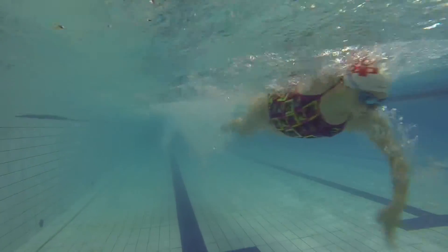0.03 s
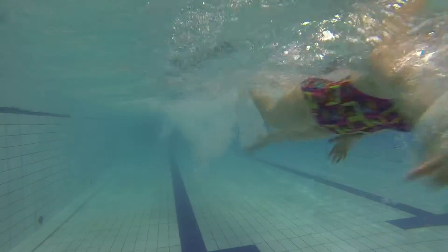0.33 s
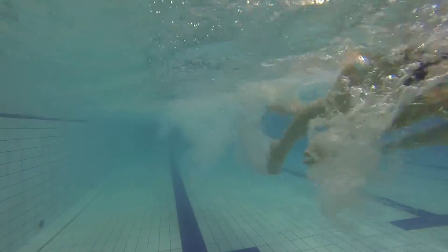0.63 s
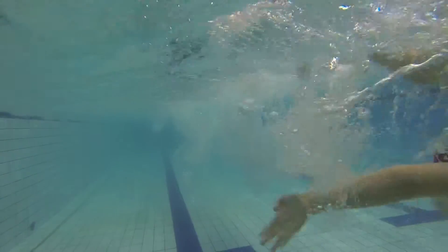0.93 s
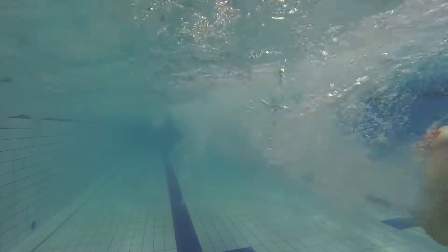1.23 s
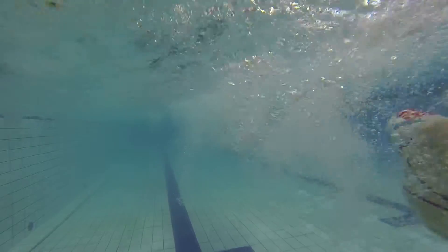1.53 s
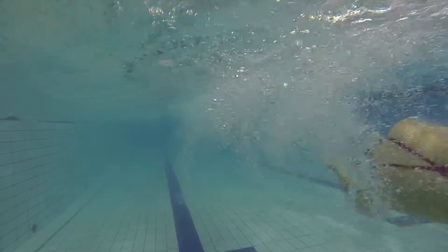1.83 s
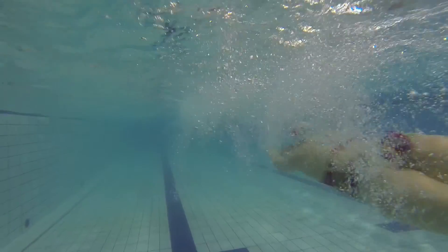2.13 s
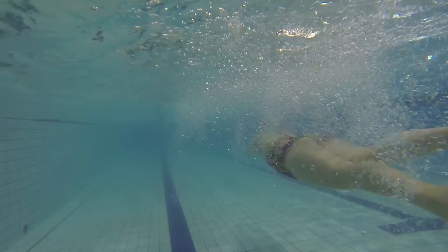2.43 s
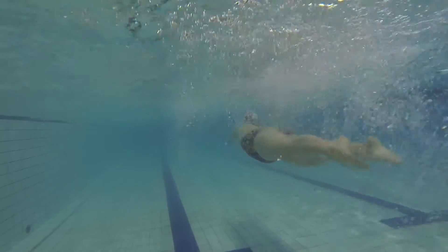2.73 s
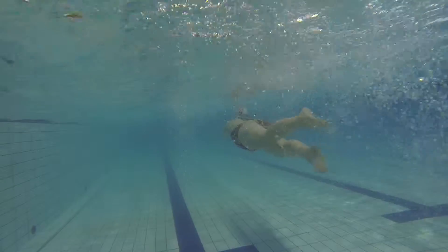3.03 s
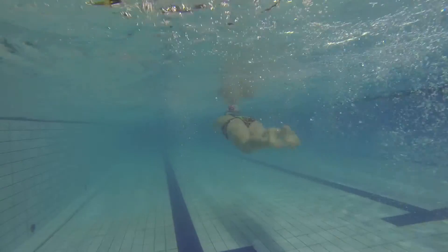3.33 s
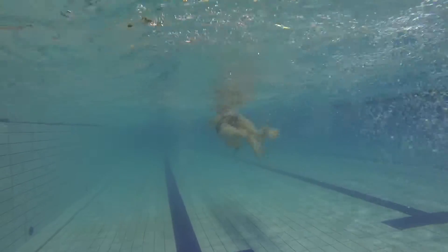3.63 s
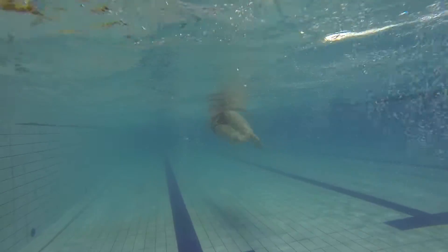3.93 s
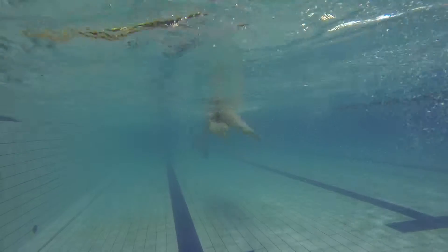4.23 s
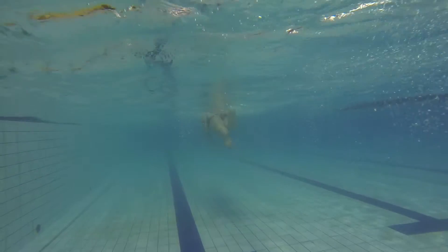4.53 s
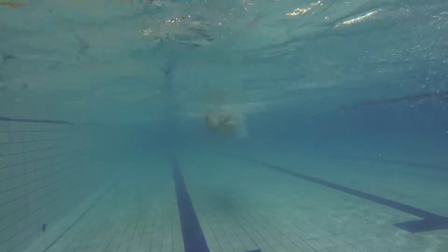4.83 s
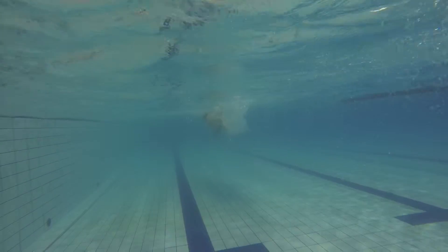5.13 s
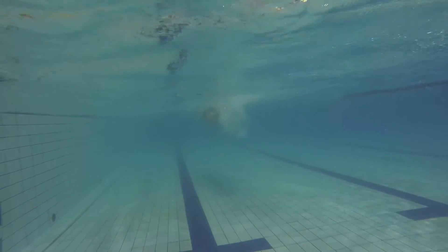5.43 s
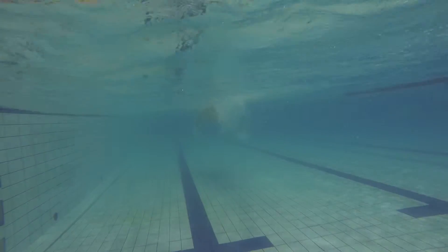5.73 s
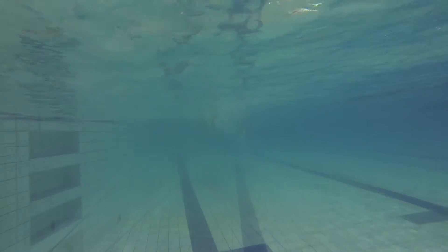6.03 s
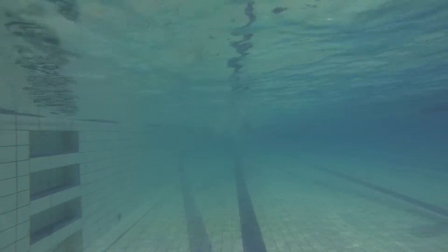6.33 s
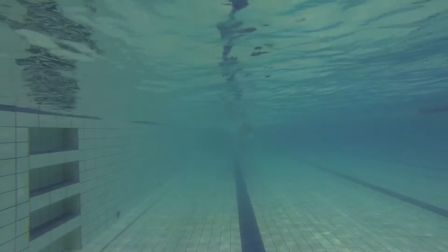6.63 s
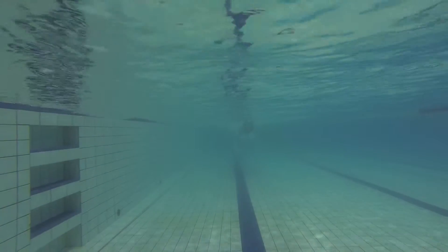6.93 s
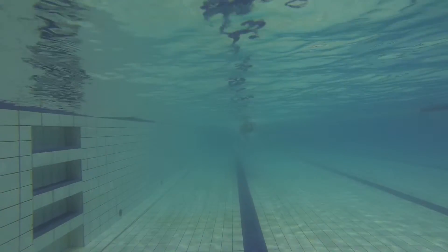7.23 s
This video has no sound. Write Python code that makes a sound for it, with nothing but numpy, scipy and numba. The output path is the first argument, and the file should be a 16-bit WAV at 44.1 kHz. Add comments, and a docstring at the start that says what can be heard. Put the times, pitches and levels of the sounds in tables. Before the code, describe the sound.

Heard underwater, a swimmer's strokes boom, gurgle and fizz, two knocks hit the microphone, then the bubbles thin and a low drone rises.

```python
"""Swimmer passing, heard under water

A swimmer strokes past a submerged camera in a pool, turns and glides away kicking. Arms and feet
drag down air: big pockets boom, and clouds of bubbles gurgle and fizz, muffled by the ringing housing.
Two knocks hit the housing; once the swimmer is far off, the low hum of the pool takes over."""
import sys
import numpy as np
from scipy import signal
from scipy.fft import rfft, irfft, next_fast_len
from scipy.io import wavfile
from scipy.ndimage import uniform_filter1d
from numba import njit

SR = 44100
rng = np.random.default_rng(int(sys.argv[2]) if len(sys.argv) > 2 else 0)


def master_out(mix):
    """Clip the mix to full scale and print it as 16-bit PCM to the path in sys.argv[1]."""
    frames = np.transpose(np.atleast_2d(mix))
    ceiling = np.clip(frames, -1, 1)
    pcm = np.round(ceiling * 32767).astype(np.int16)
    wavfile.write(sys.argv[1], SR, pcm)


N = 329427
TIME = np.arange(N) / SR

# close strokes, from the last arm pulls to the push off the wall:
# t/s, length/s, churn/dB, gurgle/dB, fine gurgle/dB re gurgle, foam/dB
STROKES = [(0.15, 0.093, -49, -31, -8, -66), (0.327, .21, -31, -25.5, -7.5, -37),
           (0.632, .18, -29, -34.5, -5.5, -42), (1.188, 0.21, -36, -34, -17, -42.5),
           (1.443, 0.22, -32, -32.5, -26, -44.5), (1.825, 0.033, -34.5, -32, -25, -52),
           (2.05, 0.13, -37.5, -28.5, -0.5, -45.5)]


def undb(db):
    """Decibels to gain."""
    return 10 ** (np.asarray(db) / 20)


def curve(rows, axis=1):
    """One column of a table, joined by straight lines in time."""
    rows = np.array(rows)
    return np.interp(TIME, rows[:, 0], rows[:, axis])


def unit(x):
    """Scale to rms 1."""
    return x / np.sqrt(np.mean(x ** 2))


def even(x, size=6000):
    """Hold the slow level at 1 and keep the quick flicker."""
    return x / np.sqrt(uniform_filter1d(uniform_filter1d(x ** 2, size), size // 2) + 1e-18)


def walk(rate):
    """Smooth random wander, spread near 1."""
    return np.interp(TIME * rate, np.arange(1024), 1.2 * rng.standard_normal(1024))


def lowpass(x, hz):
    """Steep low-pass."""
    return signal.sosfilt(signal.ellip(8, .2, 70, hz, fs=SR, output="sos"), x)


def add(out, start, sound):
    """Mix a sound in at a time."""
    i = max(int(start * SR), 0)
    out[i:i + len(sound)] += sound[:max(N - i, 0)]


def swell_and_fade(swell, t60):
    """Envelope: a smooth attack, then exponential decay; times in seconds."""
    t = np.arange(int((swell + t60) * SR)) / SR
    attack = np.sin(np.pi / 2 * np.minimum(t / swell, 1)) ** 2
    return attack * undb(-60 * np.maximum(t - swell, 0) / t60)


def ring(hz, swell, t60, glide=0):
    """A tone that swells and dies away; glide bends its pitch up."""
    envelope = swell_and_fade(swell, t60)
    t = np.arange(len(envelope)) / SR
    return envelope * np.sin(2 * np.pi * hz * t * (1 + glide * t / (swell + t60) / 2))


@njit
def grains(starts, hz, cycles, size, glide, length):
    """Sum of damped bubble tones with a soft onset, each gliding upward."""
    out = np.zeros(length)
    for k in range(len(starts)):
        n = int(cycles[k] * SR / hz[k]) + 2
        omega = 2 * np.pi * hz[k] / SR
        step, bend = np.exp(1j * omega - 6 / n), np.exp(1j * omega * glide / n)
        phasor, onset, ease = size[k] + 0j, 1., np.exp(-omega / 5)
        for i in range(starts[k], min(starts[k] + n, length)):
            phasor *= step
            step *= bend
            onset *= ease
            out[i] += phasor.imag * (1 - onset)
    return out


def housing(x, size=8192):
    """The camera housing muffles the water and rings at its own resonances."""
    # housing resonances: f/Hz, width/Hz, level/dB
    resonances = [(32, 77, 2), (78, 213, 3), (190, 52, 0.5), (244, 68, -0.5), (352, 200, -12),
                  (440, 97, -3), (521.6, 27, 0.5), (637.3, 108, 3.5), (804, 313, -6.5), (1070, 64, -8.5),
                  (1230, 330, -13), (1559, 253, -13), (2230, 386, -21), (2970, 100, -36), (3520, 900, -35),
                  (4980, 450, -46.5), (5600, 360, -47), (6470, 430, -46), (8800, 3800, -54),
                  (11200, 530, -52.5), (13000, 4400, -60.5)]
    # dips where neighbouring resonances cancel: f/Hz, width/Hz, gain/dB
    notches = [(1094, 56, -15.5), (2110, 370, -4)]
    f = np.maximum(np.arange(size // 2 + 1) * SR / size, 1)
    power = sum((undb(db) / (1 + ((f / hz - hz / f) * hz / width) ** 2)) ** 2
                for hz, width, db in resonances)
    dips_db = sum(db / (1 + (2 * (f - hz) / width) ** 2) for hz, width, db in notches)
    # minimum phase, so the ringing follows each bubble
    cepstrum = irfft(np.log(np.sqrt(power) * undb(dips_db)))
    cepstrum[1:size // 2] *= 2
    cepstrum[size // 2 + 1:] = 0
    impulse = irfft(np.exp(rfft(cepstrum)))
    return signal.fftconvolve(x, impulse)[:N]


def cloud(low_hz, high_hz, cycles, spread_db, clump_db, count):
    """A steady bed of bubbles of one size class, shed in clumps and heard through the housing."""
    when, pitch, life, strength = rng.random((count, 4)).T
    starts = (when * N).astype(np.int64)
    hz = np.minimum(low_hz * (high_hz / low_hz) ** pitch, SR / 3)
    db = -spread_db * np.log(np.maximum(1 - strength, 4 / count))
    db += clump_db * walk(30)[starts]
    # small bubbles ring briefly, so they must peak higher to carry the same power per Hz
    tones = grains(starts, hz, cycles * (.5 + life), undb(db) * hz, glide=0.19, length=N)
    # nothing of the bubbles sounds below the band's lowest pitch
    low_cut = signal.butter(6, .85 * low_hz, "high", fs=SR, output="sos")
    return even(housing(signal.sosfilt(low_cut, tones)))


def flow(trail_db, peaks_db, swell, t60):
    """Gain of one bubble size: the trail plus the strokes, each of which swells, holds and dies away."""
    power = undb(trail_db) ** 2 * np.ones(N)
    for (start, length, *_), db in zip(STROKES, peaks_db):
        rise = np.sin(np.pi / 2 * np.clip((TIME - start) / swell, 0, 1)) ** 2
        decay_db = 60 * np.maximum(TIME - start - length, 0) / t60
        power += (rise * undb(db - decay_db)) ** 2
    return np.sqrt(power)


def gurgle(coarse_gain, fine_gain):
    """Pea-sized bubbles; the push from the wall tears them finer."""
    large = cloud(low_hz=352, high_hz=507.5, cycles=10.2, spread_db=3.0, clump_db=1.0, count=2500)
    middle = cloud(low_hz=496.5, high_hz=762, cycles=18.9, spread_db=1.5, clump_db=1.5, count=4500)
    fine = cloud(low_hz=715, high_hz=1153, cycles=11.8, spread_db=2.5, clump_db=0.6, count=4500)
    return even(middle + large * undb(-1)) * coarse_gain + fine * undb(-2) * fine_gain


def wake(slosh_db=-47.5):
    """The swimmer's trail of air, from slow churning pockets up to fine fizz; every stroke feeds it."""
    # air behind the kicking feet, loud when near and again as the swimmer surfaces:
    # t/s, gurgle/dB, fine gurgle/dB re gurgle, surface foam/dB
    trail = [(0, -35.5, -8, -43.5), (1.05, -34, -8, -44), (2.0, -33, -17.5, -49.5),
             (2.3, -34.5, -1.5, -49.5), (2.58, -42.5, -7, -51.5), (3.0, -43.5, -8.5, -53),
             (3.6, -44, -4.5, -51.5), (4.0, -46.5, -1, -52), (4.25, -45, -5.5, -51), (4.85, -40, -9, -45.5),
             (5.3, -39.5, -12.5, -46), (5.7, -43, -10, -49), (6.05, -46, -13.5, -51.5),
             (6.65, -48, -8, -63.5), (7.05, -50.5, -5.5, -66), (7.47, -49, -12, -65)]
    # fizz hanging in the trail: t/s, level/dB
    trail_fizz = [(0, -68), (0.55, -63), (0.92, -70.5), (1.15, -63.5), (1.62, -66), (1.8, -73),
                  (2.4, -77.5), (5.8, -75.5), (6.3, -82), (7.47, -84.5)]
    trail_db, trail_fine_db, trail_foam_db = (curve(trail, axis=k) for k in range(1, 4))
    _, _, churn_db, gurgle_db, fine_db, foam_db = np.transpose(STROKES)
    fizz_db = -67.5 + 0.23 * (foam_db + 47.5)  # fizz grows more slowly than the foam that sheds it

    churn_gain = flow(slosh_db, churn_db, swell=0.012, t60=1.88)
    coarse_gain = flow(trail_db, gurgle_db, swell=0.17, t60=0.65)
    fine_gain = flow(trail_db + trail_fine_db, gurgle_db + fine_db, swell=0.17, t60=0.65)
    foam_gain = flow(trail_foam_db, foam_db, swell=0.032, t60=0.6)
    fizz_gain = flow(curve(trail_fizz), fizz_db, swell=0.031, t60=0.68)
    spray_gain = undb(-5) * np.sqrt(foam_gain * fizz_gain)

    churn = cloud(low_hz=20.84, high_hz=355, cycles=5.6, spread_db=-0.5, clump_db=-2.0, count=4000)
    small = cloud(low_hz=1100, high_hz=2650, cycles=24.5, spread_db=2.07, clump_db=0.85, count=22000)
    plinks = cloud(low_hz=1200, high_hz=1800, cycles=36, spread_db=4.5, clump_db=0, count=400)
    spray = cloud(low_hz=2584, high_hz=4350, cycles=39, spread_db=2.5, clump_db=0.3, count=18000)
    fizz = cloud(low_hz=4670, high_hz=14800, cycles=29, spread_db=2.9, clump_db=1.4, count=60000)
    foam = small * undb(-1) + plinks * undb(-11)
    body = churn * churn_gain + gurgle(coarse_gain, fine_gain) * undb(-0.54)
    return body + foam * foam_gain + spray * spray_gain + fizz * fizz_gain


def bubbles(pop_cycles=32):
    """Single air pockets boom; bubbles bloop and pop near the housing, strays at random."""
    # the largest pockets and bubbles: t/s, f/Hz, peak/dB, t60/s
    pockets = [(0.000, 66, -14, 0.074), (0.164, 641, -23.5, 0.083), (0.312, 170, -22, 0.08),
               (0.333, 1160, -21, 0.01), (0.349, 76.4, -8, .43), (0.38, 1050, -23.5, 0.015),
               (0.451, 127.5, -22.5, 0.9), (0.521, 191.5, -19.5, 0.47), (0.534, 624, -16, 0.073),
               (0.652, 41.6, -15.5, 0.51), (0.655, 187.2, -17.5, 0.16), (0.709, 640, -17, 0.058),
               (0.716, 462, -21, 0.076), (0.770, 79.4, -16.5, 0.16), (0.827, 649, -18, 0.096),
               (0.864, 59, -28, 1), (0.892, 620, -22.5, .03), (1.002, 388, -24.5, 0.049),
               (1.108, 130, -20, 0.071), (1.197, 622, -27, 0.061), (1.341, 185, -22.5, 0.12),
               (1.436, 661, -25, 0.14), (1.485, 546.4, -17.5, .2), (1.507, 187, -15.5, 0.13),
               (1.520, 42, -26, 0.27), (1.530, 93.6, -18, .15), (1.600, 622, -26.5, 0.2),
               (1.645, 78, -21, 0.085), (1.677, 626, -20, 0.23), (1.865, 369, -17.5, 0.056),
               (1.868, 627, -17, 0.027), (2.064, 71, -21.5, 0.067), (2.133, 716, -21.5, 0.035),
               (2.201, 365, -20.5, 0.094), (2.256, 217, -24.5, 0.082), (2.261, 657, -23.5, 0.056),
               (2.447, 127, -32.5, 0.22), (2.781, 73.6, -30, 0.31), (3.957, 414, -38, 0.14),
               (4.032, 58, -34, 0.17), (4.402, 75.5, -34.5, 0.36), (4.837, 56, -30.5, 0.62),
               (4.887, 53.5, -30.5, 0.35), (4.843, 212, -31.5, 0.11), (4.996, 435, -33, 0.31),
               (5.1705, 1510, -20, 0.026), (6.062, 515, -31.5, 0.079), (6.236, 570, -20.5, 0.049),
               (6.595, 27, -32.5, 0.6), (6.882, 463, -32, 0.11), (7.268, 405, -31, 0.049),
               (7.39, 382, -32, .1)]
    # tiny bubbles bursting: t/s, peak/dB, f/Hz
    pops = [(0.242, -40, 3600), (0.335, -35, 3500), (3.445, -42, 1230), (3.555, -47, 3720),
            (3.911, -37.5, 1530), (4.916, -37.5, 2210), (5.309, -36, 2220), (5.518, -36, 1680),
            (5.828, -42.5, 2200), (6.498, -55, 5030), (6.525, -38, 750), (7.011, -57, 4560),
            (7.283, -46, 1680)]
    # stray bubbles all through the pool: lowest f/Hz, highest f/Hz, base level/dB
    strays = [(403, 760, -38), (1230, 2000, -45)]
    out = np.zeros(N)
    for start, hz, db, t60 in pockets:
        pinch_off_s = 0.0061 * np.sqrt(t60 / 0.14)  # long ringers swell more slowly
        add(out, start, undb(db) * ring(hz, pinch_off_s, t60, glide=0.019))
    for start, db, hz in pops:
        add(out, start, undb(db) * ring(hz, swell=7 / hz, t60=pop_cycles / hz, glide=0.068))
    for low_hz, high_hz, base_db in strays:
        for when, pitch, strength in rng.random(size=(18, 3)):
            hz = low_hz * (high_hz / low_hz) ** pitch
            tone = ring(hz, swell=2.8 / hz, t60=pop_cycles / hz, glide=0.067)
            add(out, when * N / SR, undb(base_db - 9 + 6 * strength) * tone)
    return out


def electronics(hiss_db=-73, corner_hz=3800):
    """The camera's smooth hiss and thin steady whine."""
    # whine partials: f/Hz, rms level/dB
    partials = [(10950, -90), (10998, -91.5), (13598, -101)]
    hiss = signal.lfilter(*signal.butter(1, corner_hz, fs=SR), rng.standard_normal(N))
    whine = sum(np.sqrt(2) * undb(db) * np.sin(2 * np.pi * hz * TIME) for hz, db in partials)
    return undb(hiss_db) * unit(hiss) + whine


def splashes():
    """A limb breaking the surface lets loose a brief bright spray of bubbles."""
    # surface hits: t/s, level/dB, swell/s, t60/s
    hits = [(0.315, -43, 0.013, 0.56), (0.415, -46.5, 0.017, 0.53), (1.19, -45, .012, 0.9),
            (1.30, -50.5, 0.032, 0.61), (1.666, -37.5, 0.019, 0.089), (2.078, -52, 0.0044, .05)]
    burst = np.zeros(N)
    for start, db, swell, t60 in hits:
        add(burst, start, undb(db) * swell_and_fade(swell, t60))
    return burst * cloud(low_hz=1720, high_hz=5300, cycles=17, spread_db=3.5, clump_db=3.0, count=22000)


def knocks(split_hz=1800, reach_octaves=0.27, grit_db=-11):
    """Each knock rings the housing: a dull thud in the low modes, a gritty tick in the high ones."""
    # contacts that make up the two knocks: t/s, thud/dB, tick/dB, tick centre f/Hz
    contacts = [(2.2100, -25, -33, 6960), (2.2119, -31, -32.5, 3030), (2.714, -29, -66, 3000),
                (2.7159, -36, -27.5, 5630), (2.7205, -22.5, -28, 3700)]
    # modes of the struck housing: f/Hz, gain/dB, t60/s
    modes = [(260, -1.5, 0.061), (510, -4.5, 0.071), (703, 0.5, 0.048), (1058, -10, 0.077),
             (2060, 24, 0.03), (3340, 1.5, 0.016), (3920, 2, 0.021), (5540, -1.5, 0.014), (6650, 2.5, .014),
             (8200, -11, 0.012)]
    out = np.zeros(N)
    for start, thud_db, tick_db, centre_hz in contacts:
        for hz, db, t60 in modes:
            tick = undb(tick_db) / (1 + (np.log2(hz / centre_hz) / reach_octaves) ** 2) ** 2
            blow = undb(thud_db) if hz < split_hz else tick
            add(out, start, blow * undb(db) * ring(hz, swell=0.00035, t60=t60))
        envelope = swell_and_fade(swell=0.00018, t60=0.022)
        band = signal.butter(3, [centre_hz / 2, min(centre_hz * 1.1, SR / 3)], "band", fs=SR, output="sos")
        grit = unit(signal.sosfilt(band, rng.standard_normal(SR)))[:len(envelope)]
        add(out, start, undb(tick_db + grit_db) * envelope * grit)
    return out


def hum():
    """The pool's low, slightly throbbing drone, with a few faint rings above it."""
    # tone colour of the drone: f/Hz, relative level/dB
    spectrum = [(20, 4.5), (60, -9), (170, -20.5), (225, 6.5), (275, -2), (325, 8.5), (430, -11.5),
                (555, -25.5), (630, -12.5), (840, -9), (1000, -33.5), (1200, -19.5), (1400, -41),
                (1800, -30.5), (2200, -41), (3000, -43)]
    # narrow rings on top of it: f/Hz, width/Hz, boost/dB
    rings = [(1106, 47, 15), (1715, 93, 9.5), (3240, 160, 11.5), (5500, 130, 12.5)]
    # the drone's rise: t/s, level/dB
    levels = [(0, -79.5), (5.7, -68), (6.1, -43), (6.5, -41.5), (6.65, -36.5), (7.15, -40.5), (7.47, -37.5)]
    hz, db = np.transpose(spectrum)
    size = next_fast_len(N, real=True)
    f = np.maximum(np.arange(size // 2 + 1) * SR / size, 1)
    rings_db = sum(lift / (1 + (2 * (f - centre) / width) ** 2) for centre, width, lift in rings)
    skirts = np.minimum(f / hz[0], 1) ** 2 * np.minimum(hz[-1] / f, 1) ** 2
    colour = undb(np.interp(np.log(f), np.log(hz), db) + rings_db) * skirts
    drone = irfft(rfft(rng.standard_normal(size)) * colour, size)[:N]
    throb_db = 1.3 * walk(12)
    return even(drone) * undb(curve(levels) + throb_db)


def scene():
    """All layers, mixed to mono."""
    return (wake() + splashes() + bubbles() + knocks() + hum() + electronics())[None]


def record(dry):
    """The top octave fades out late on, and the very top is cut."""
    dull_hz, top_hz = 7400, 15000
    brightness = np.clip((6.6 - TIME) / 0.83, 0, 1)
    dull = lowpass(lowpass(dry, dull_hz)[:, ::-1], dull_hz)[:, ::-1]  # both ways, for zero phase
    return lowpass(dull + brightness * (dry - dull), top_hz)


dry = scene()
out = record(dry)
master_out(out)
```